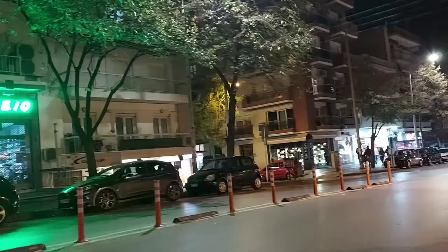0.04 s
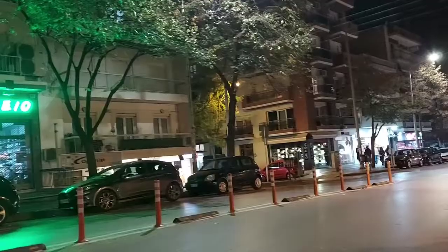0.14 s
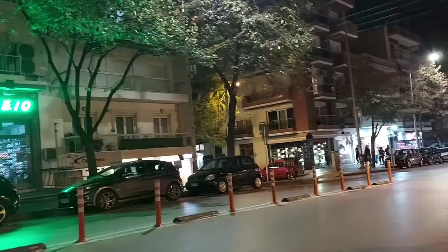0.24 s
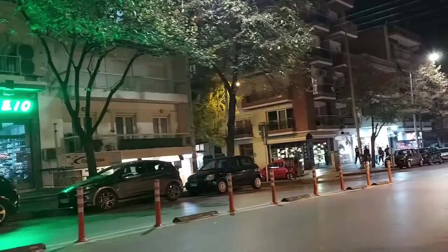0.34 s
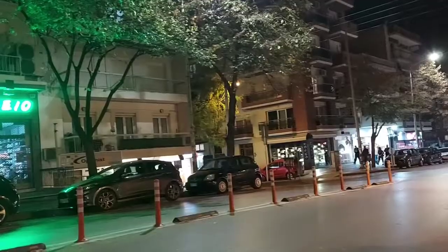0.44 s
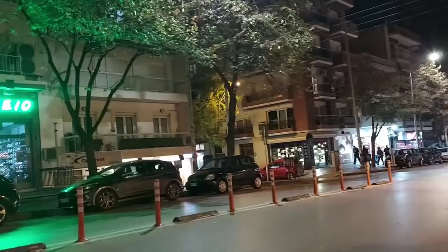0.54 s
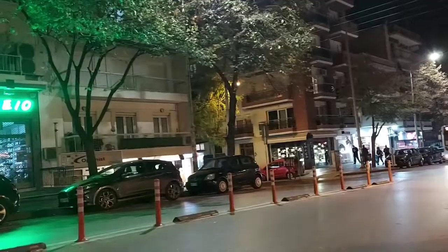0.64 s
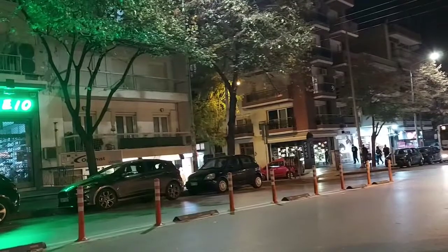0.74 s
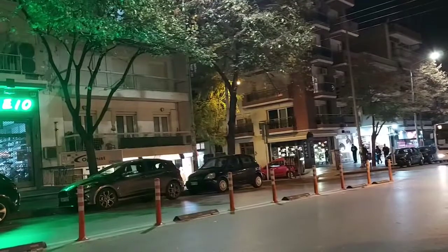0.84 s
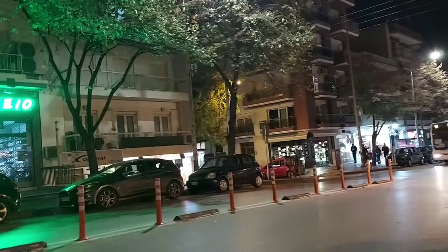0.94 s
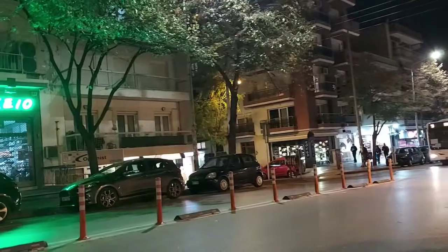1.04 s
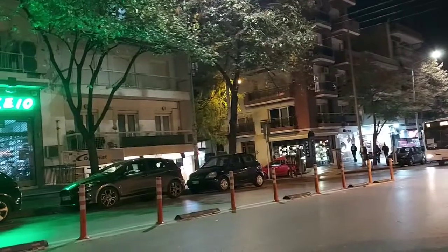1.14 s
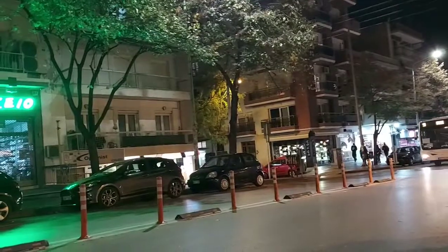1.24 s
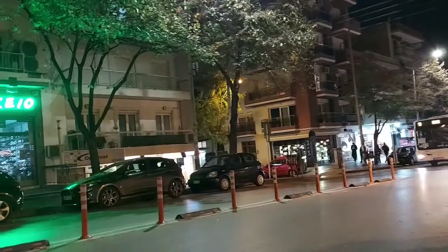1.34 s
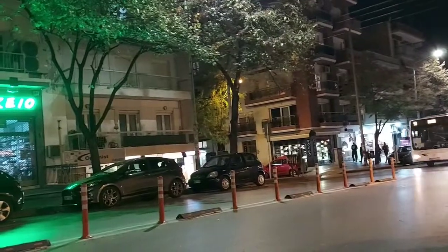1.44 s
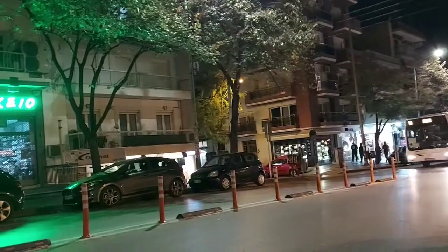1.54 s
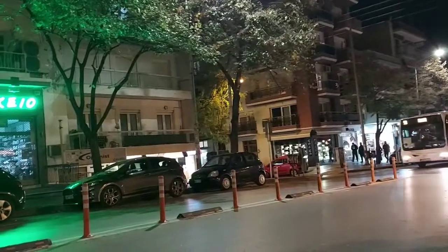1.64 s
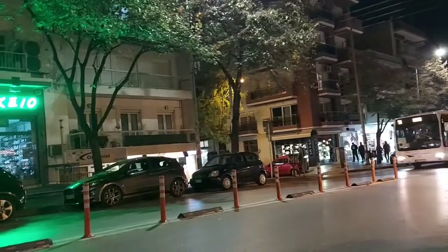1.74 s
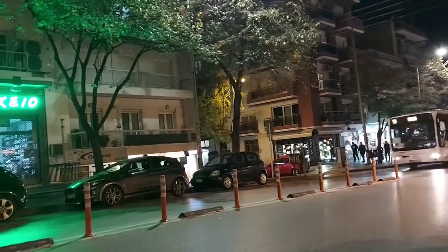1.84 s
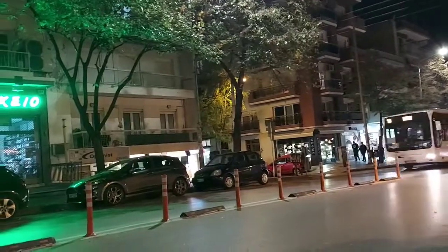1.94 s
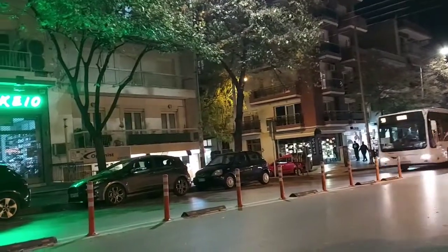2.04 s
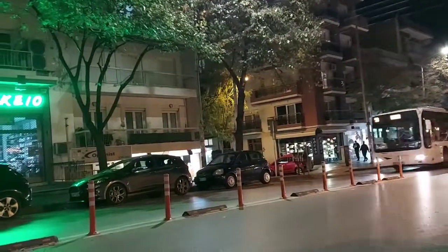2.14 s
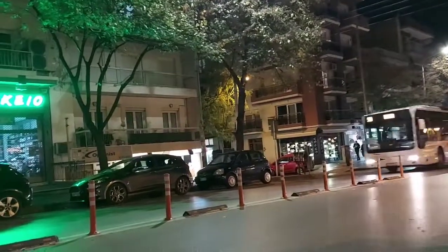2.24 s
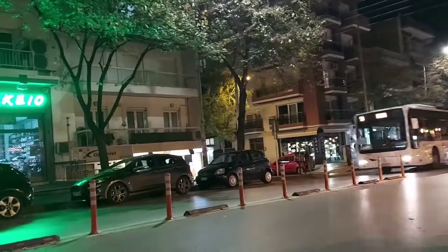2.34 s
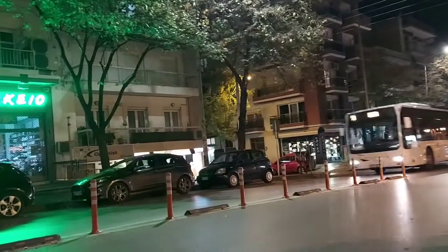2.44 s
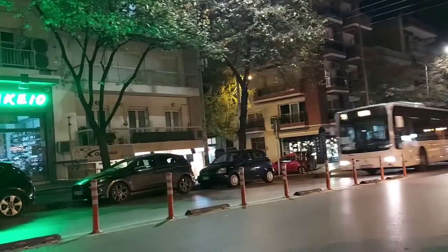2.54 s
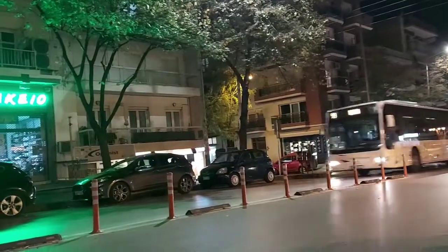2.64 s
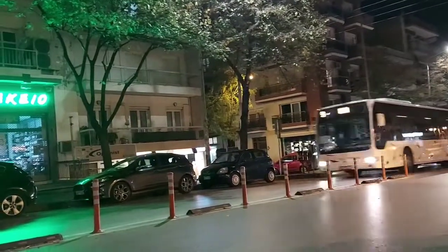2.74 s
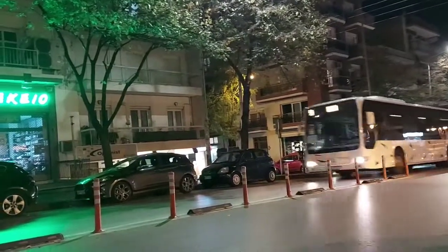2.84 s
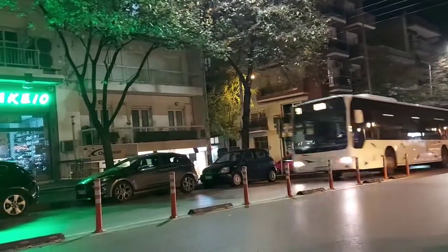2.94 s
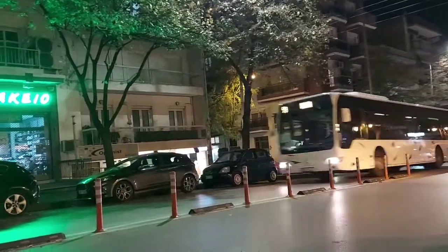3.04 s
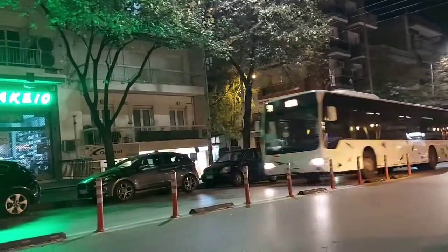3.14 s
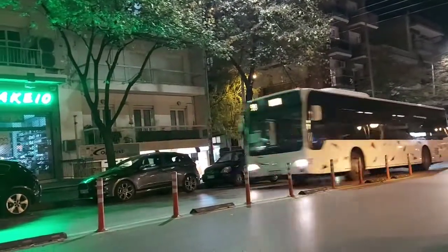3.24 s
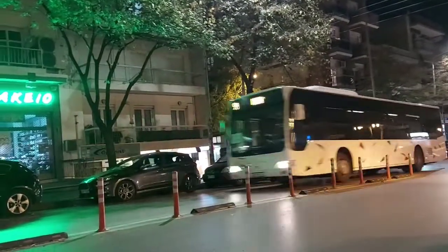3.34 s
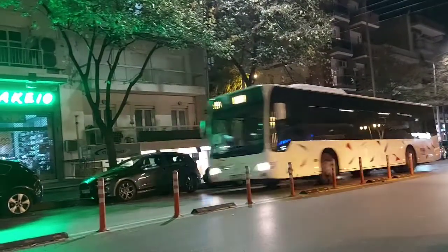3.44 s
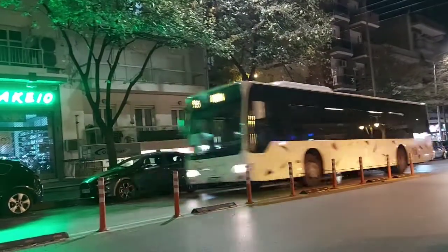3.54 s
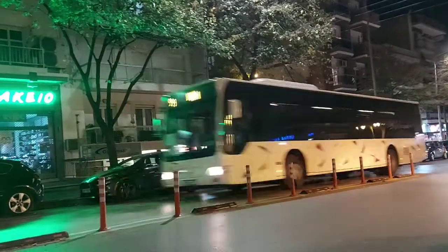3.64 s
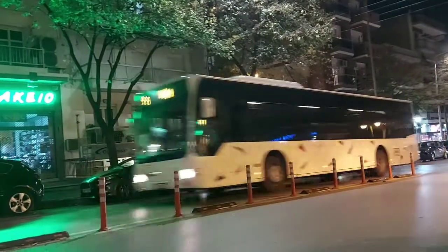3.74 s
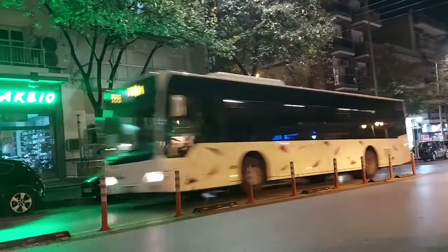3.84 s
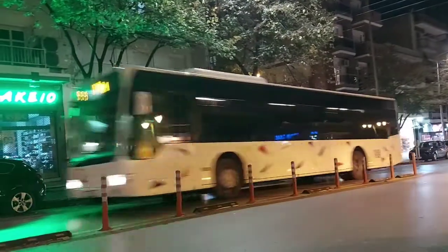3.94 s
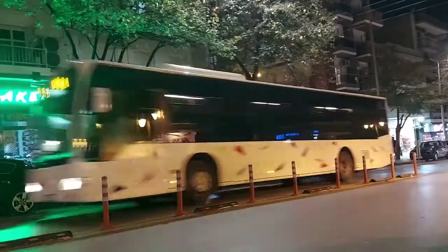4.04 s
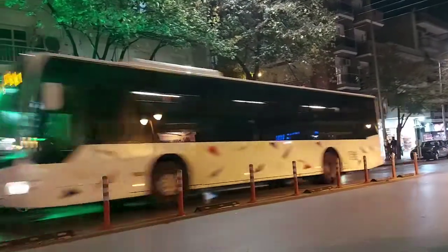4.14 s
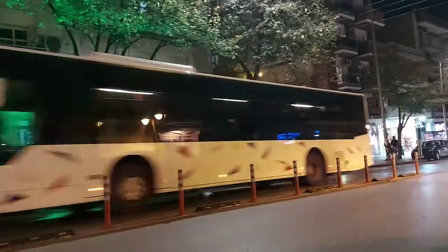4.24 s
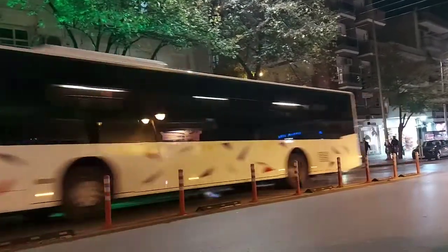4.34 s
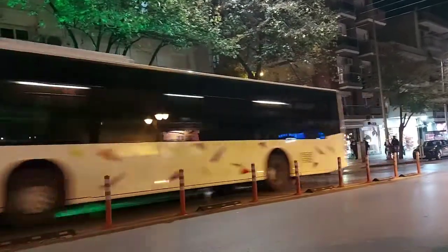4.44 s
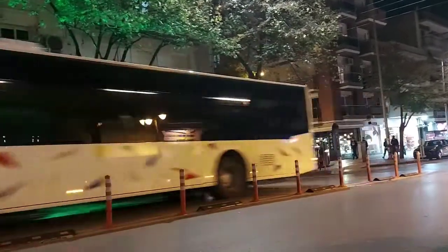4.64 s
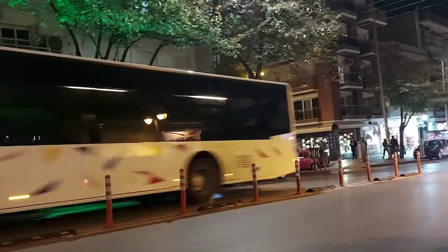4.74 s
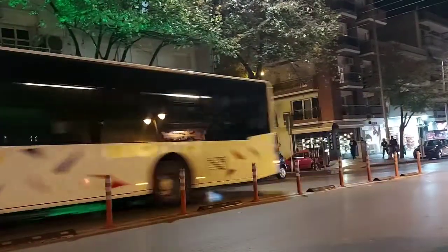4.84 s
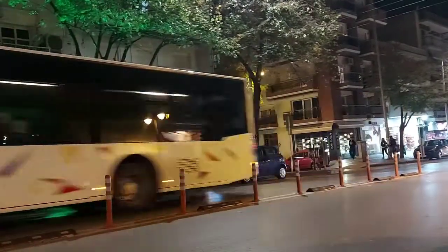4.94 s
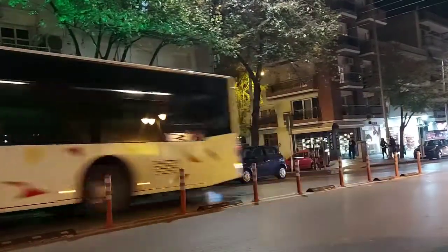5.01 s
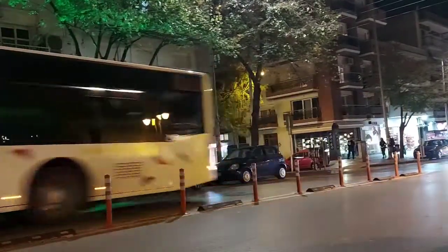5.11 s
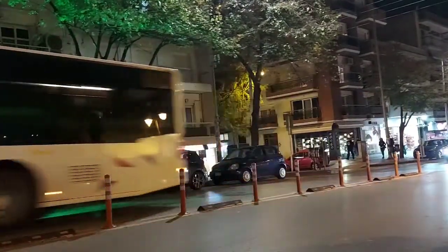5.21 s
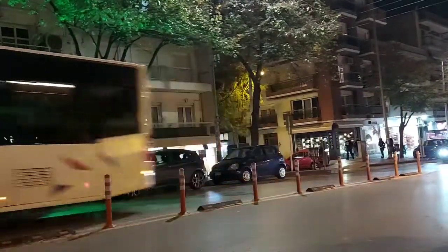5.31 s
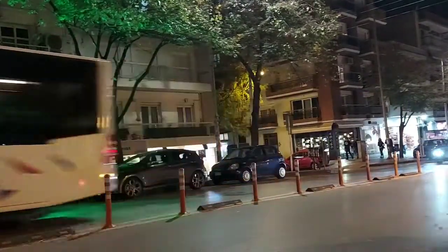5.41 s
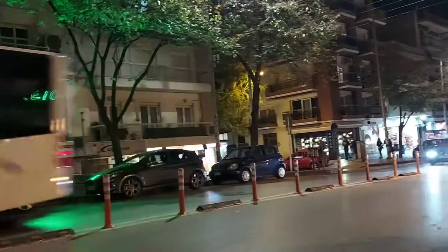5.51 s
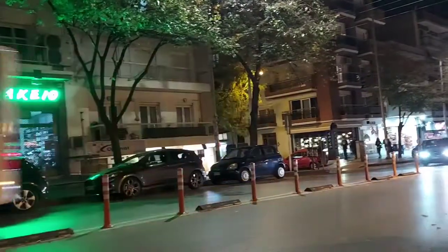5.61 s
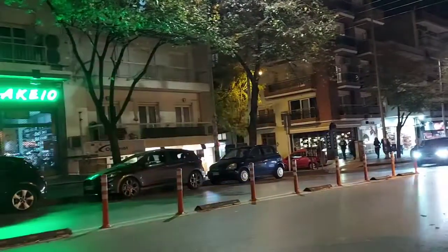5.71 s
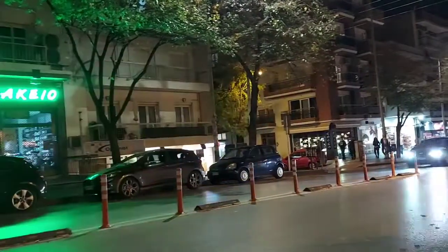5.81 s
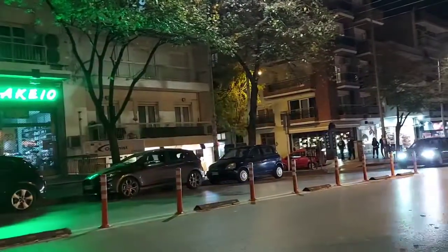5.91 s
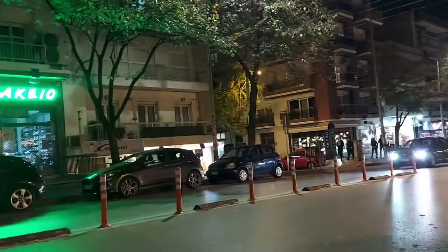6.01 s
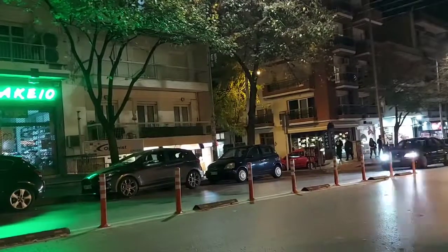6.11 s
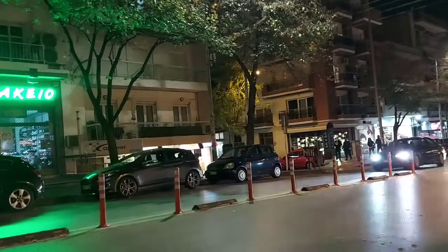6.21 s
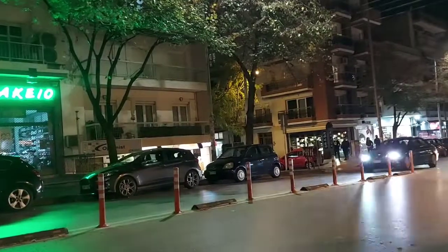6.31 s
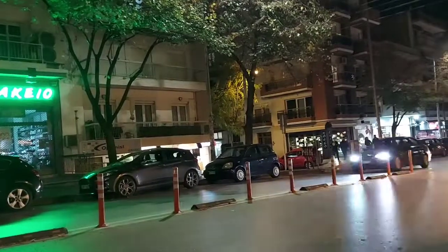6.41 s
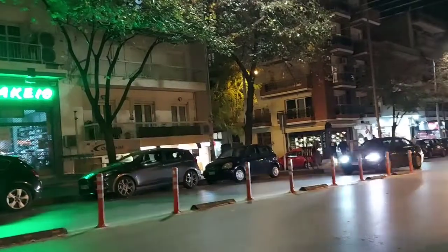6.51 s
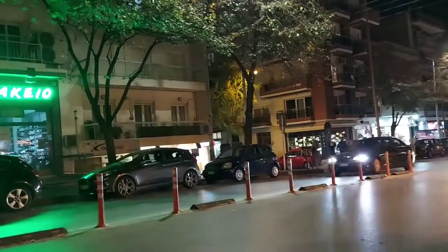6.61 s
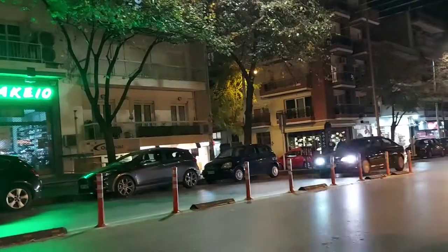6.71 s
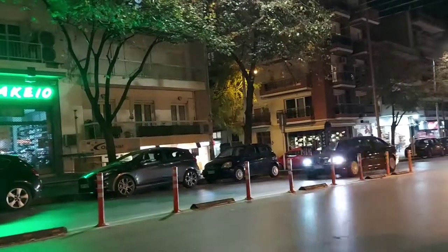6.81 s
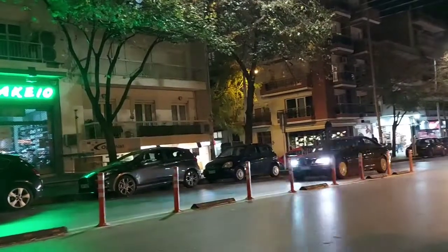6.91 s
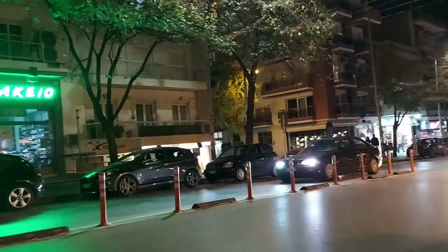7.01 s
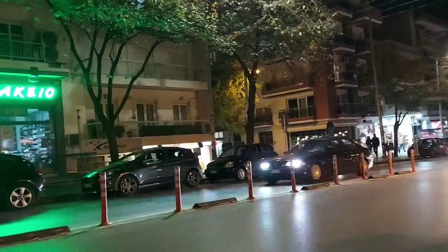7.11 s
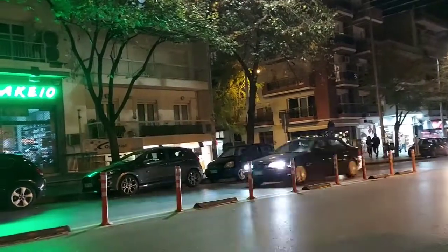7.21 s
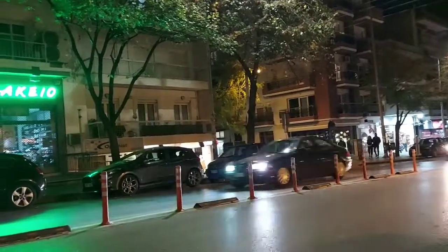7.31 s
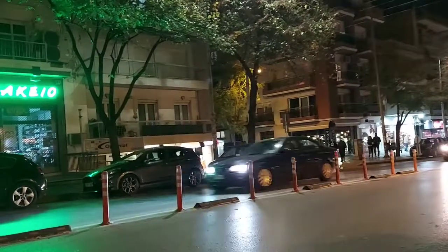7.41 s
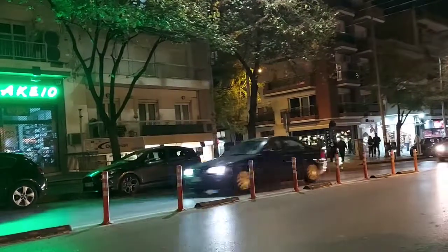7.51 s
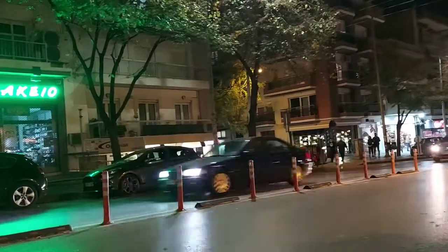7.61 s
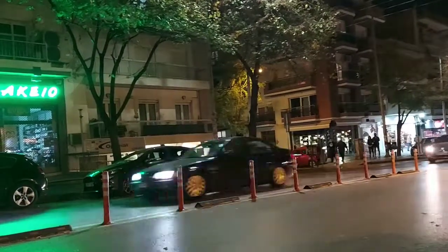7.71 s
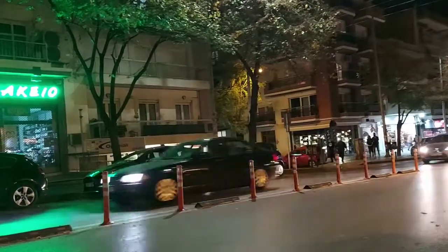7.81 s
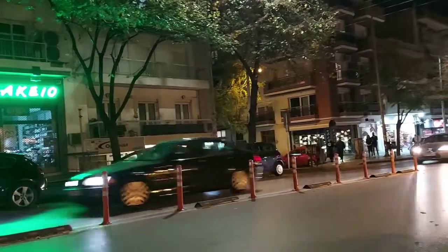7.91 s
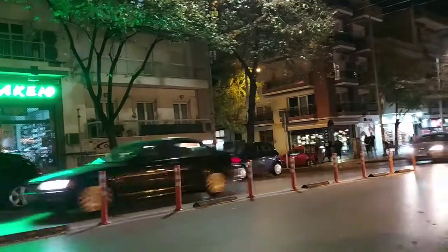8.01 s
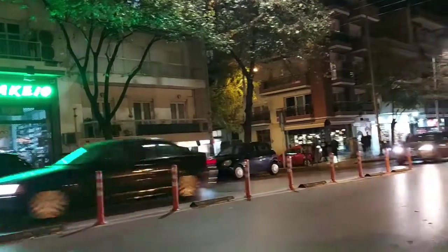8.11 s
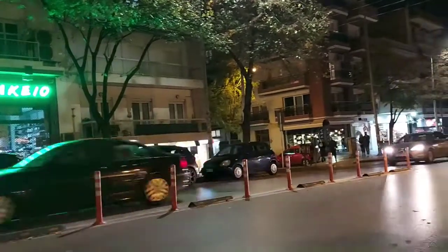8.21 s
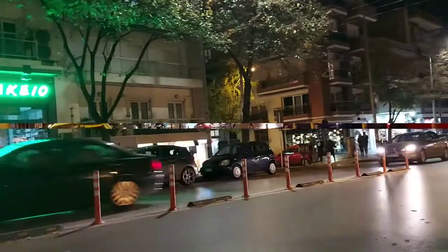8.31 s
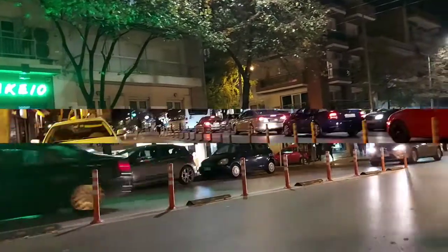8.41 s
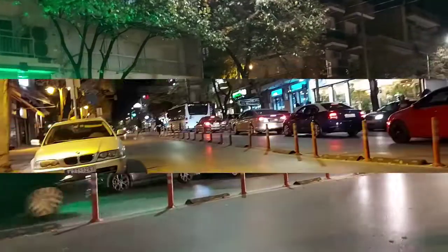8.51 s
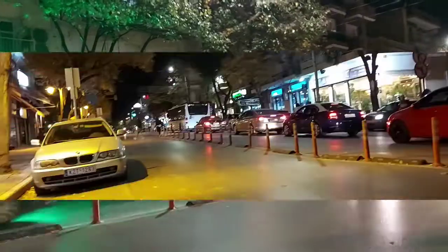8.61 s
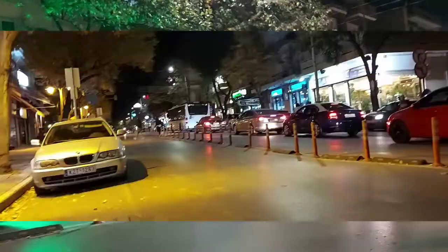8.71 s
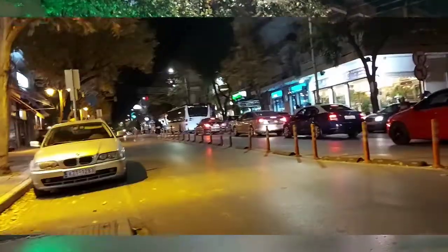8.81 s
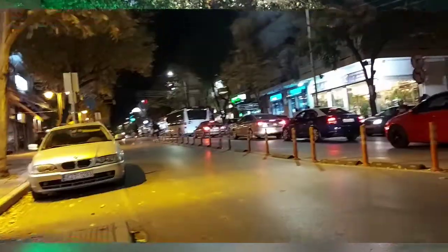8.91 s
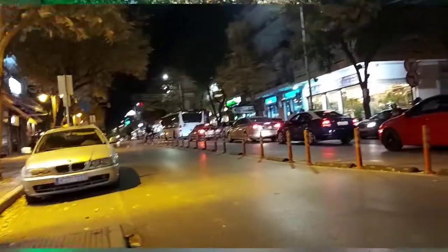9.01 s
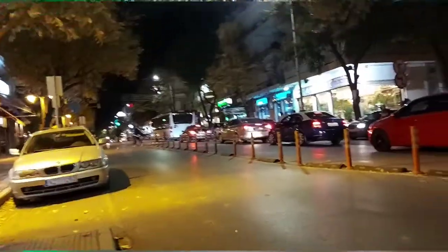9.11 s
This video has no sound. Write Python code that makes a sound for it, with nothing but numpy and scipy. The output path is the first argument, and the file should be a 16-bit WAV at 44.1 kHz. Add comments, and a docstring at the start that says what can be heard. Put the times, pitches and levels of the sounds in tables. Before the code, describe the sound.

A phone at the roadside picks up a soft distant putter and thin brake-like squeals, then a city bus growing from the right into a deep, throbbing diesel drone with knocking, fan hiss and gear whine. It recedes leftward, engine pitch sinking. A car follows, its engine rising and its tyres roaring and sizzling, until a hard cut. A brief gap leads to a quieter wash of slow traffic with one engine climbing. House fronts add short echoes.

```python
"""Night street, hand-held phone with two microphone ports, house fronts around.
At first faint squeals and a puttering, sinking engine up the street; a diesel city bus nears from the right.
At 5.3 s its engine is abreast, close by, droning, knocking and whining; at 6.4 s the exhaust quietens.
A car follows on the left, accelerating under a swelling tyre roar. At 8.8 s the sound is cut off with a very
short tail; after a brief hush a new scene starts, slow distant traffic.
Vehicles are shaft-locked tones and coloured noise; each part swells and fades as its beams sweep past."""
import sys
import numpy as np
from scipy import signal
from scipy.fft import rfft, irfft, next_fast_len
from scipy.io import wavfile
from scipy.ndimage import map_coordinates

SR = 44100
rng = np.random.default_rng(int(sys.argv[2]) if len(sys.argv) > 2 else 0)


def store_pcm(level_fs):
    """Save levels as 16-bit WAV."""
    pcm = np.round(np.clip(level_fs, -1, 1) * 32767).astype(np.int16)
    wavfile.write(sys.argv[1], SR, np.atleast_2d(pcm).T)


N = 403515
TIME = np.arange(N) / SR
SIZE = next_fast_len(N + 4096, True)
HZ = np.maximum(np.arange(SIZE // 2 + 1) * SR / SIZE, 1)

# Beams of a part: [faces the microphones t/s, level/dB then, approach width t/s, retreat width t/s].
# Noise colours: [f/Hz, density level/dB, relative: each colour is scaled to unit power].
# Lags are samples by which the left port is late; pans are right minus left in dB.

# Bus crank speed as heard, coasting and then braking: [t/s, crank turns per s]
CRANK = [(0, 35.3), (2.6, 34.4), (3.5, 33.65), (4.4, 33.05), (5, 32.2), (5.5, 30.8), (6.4, 28.4),
         (9.15, 21.5)]
# Exhaust boom: [crank multiple, beams as above]
EXHAUST = [(1.94, [(2.6, -29.5, 0.2, 0.49), (3.25, -30, 0.22, 0.15), (3.92, -24, 0.58, 0.5),
           (4.3, -27.5, 0.22, .45)]), (3, [(4.3, -23, 0.77, 0.4), (5.2, -18.5, 0.39, 0.51),
           (5.75, -18.5, 0.36, .8)]), (3.88, [(3.45, -32.5, 0.5, .4), (4.2, -26, 0.22, 0.088),
           (5.17, -26.5, 0.096, 0.16), (6.25, -53, .2, 0.27)])]
# Upper engine orders: [crank multiple, faces the microphones t/s, level/dB then, width t/s]
DRONE = [(1.47, 4.4, -39, 1.5), (5.88, 3.65, -40, .4), (5.88, 4.7, -35.5, .35), (5.85, 5.7, -44, .3),
         (7.42, 4.7, -43, .8), (8.27, 4.4, -36, .6), (9, 3.75, -37, .35), (9, 4.72, -36.5, .25),
         (9, 5.6, -43, .5), (10.35, 5.9, -43, .5), (13, 6, -46, .4), (14.75, 5.65, -44, .35),
         (16.33, 3.95, -41, .6), (16.27, 5.95, -42.5, .55), (18.42, 5, -42.5, .17), (20.5, 3.7, -44.5, .6),
         (21.65, 3.1, -44, .4), (22.55, 3.9, -44.5, .25)]
# Gear whine partials: [crank multiple, faces the microphones t/s, level/dB then, width t/s]
WHINE = [(32.5, 4.7, -47.5, .6), (32.5, 6.85, -48, .2), (46.8, 5.15, -46, .45), (48.6, 5.02, -43.5, .24),
         (53.3, 4.25, -50, .2), (64.3, 5.36, -49, .13), (65.1, 6.25, -51.5, .8), (92, 5.35, -52, .3),
         (93.85, 3.92, -47.5, .3), (93.5, 4.88, -51, .33), (93.4, 5.92, -47.5, .3),
         (93.9, 6.48, -51.5, .22), (114, 5.85, -57, .3), (130.6, 4.4, -54, .27), (130, 5.03, -50.5, .14),
         (130, 5.85, -54.5, .35), (140.3, 5.87, -50.5, .19)]
# Body rumble: beams [t/s, level/dB before a trim, t/s, t/s] and colour [f/Hz, level/dB]
RUMBLE_BEAMS = [(4.4, -26.5, 1.45, 0.98), (5.9, -34, 0.78, 1.1), (7.6, -31.5, 1, 1.5)]
RUMBLE = [(25, -33), (42, -17), (65, -8.5), (110, 1), (150, -4), (195, -11.5), (280, -7), (400, -14),
          (900, -52), (2500, -70)]
# Bus tyre noise: beams [t/s, level/dB before a trim, t/s, t/s] and colour [f/Hz, level/dB]
TYRE_BEAMS = [(3.6, -33.5, 1.94, 1.5), (6.4, -35.5, 1.8, 4.4)]
TYRES = [(100, -18), (300, -6), (500, -0.5), (750, -1), (1100, -6), (2500, -17), (9000, -65)]
# Front tyres singing forwards from the wedge of tread and road: beams, colour [f/Hz, level/dB]
HORN_BEAMS = [(3.15, -39.5, 0.61, 0.53)]
HORN = [(640, 3), (750, 6.5), (880, -7)]
# Diesel knock: beams [t/s, level/dB, t/s, t/s] and colour [f/Hz, level/dB]
KNOCK_BEAMS = [(5.05, -35.5, 1.46, 0.25), (5.9, -42, 0.55, .5)]
KNOCK = [(300, -5.5), (1000, -6.5), (1600, 2), (2300, -9.5), (4200, -25), (8000, -41), (14000, -58)]
# Growl of the rear engine bay: beams [t/s, level/dB, t/s, t/s] and colour [f/Hz, level/dB]
BAY_BEAMS = [(4.7, -33, 0.16, 0.24), (5.35, -32, 0.52, 1)]
BAY = [(270, -5), (315, 8.5), (420, -0.5), (560, 3.5), (660, -8.5), (780, -25), (950, -2.5), (1150, -19)]
# Fan: beams [t/s, level/dB, t/s, t/s] and colour [f/Hz, level/dB]
FAN_BEAMS = [(2.05, -44.5, 1, 0.58), (3.9, -45, 0.39, 0.19), (4.85, -45, 1, 1.5)]
FAN = [(500, -11), (1500, -5), (2200, 3), (3000, 4.5), (3650, -2.5), (4200, -0.5), (5500, -7.5),
       (7500, -10), (9000, -37), (14000, -44)]
# High hiss of the bus: beams [t/s, level/dB, t/s, t/s] and colour [f/Hz, level/dB]
HISS_BEAMS = [(3.2, -50.5, 0.25, 0.33), (5.5, -45, 1.32, 1.63)]
HISS = [(1500, -33), (4000, 3.5), (6000, -0.5), (7500, -2), (8600, -16.5), (10500, -5), (12500, -7.5),
        (14300, -19.5)]
# Loose panels rattling: [t/s, level/dB]
RATTLES = [(1.55, -40), (1.824, -36), (3.074, -31), (3.226, -34), (4.178, -31), (4.977, -32), (5.042, -30)]
# Wheels thudding over uneven asphalt: [t/s, level/dB]
THUDS = [(2.143, -30), (4.31, -16), (4.4, -19)]

# Car firing rate, cruising and then on open throttle: [t/s, f/Hz]
CAR_FIRING = [(7.15, 100), (7.5, 115), (8.3, 131.5), (8.8, 141.5)]
# Car engine: beams [t/s, level/dB, t/s, t/s]
CAR_ENGINE_BEAMS = [(7.08, -38.5, 0.14, 0.091), (7.62, -32, 0.27, 0.34), (8.7, -25, 0.53, 1.1)]
# Upper orders of the car engine: [multiple of the firing rate, level/dB against the firing tone]
CAR_ORDERS = [(1.96, -6.5), (2.94, -10), (4.55, -9)]
# Low sinking boom with the car: [reference t/s, f/Hz then, fall in Hz per s]; beams [t/s, level/dB, t/s, t/s]
BOOM = (8.5, 62.4, 5.2)
BOOM_BEAMS = [(6.66, -30.5, .17, 0.23), (8.1, -33, 0.16, 0.35), (8.55, -26.5, 0.26, 0.4)]
# Car tyre roar: beams [t/s, level/dB, t/s, t/s] and colour [f/Hz, level/dB]
CAR_TYRE_BEAMS = [(8.85, -23.5, 0.97, 1.1)]
CAR_TYRES = [(100, -7.5), (380, -7), (600, -5), (950, -7.5), (1150, -9.5), (1700, -7), (2200, -10.5),
             (3000, -17), (5000, -29), (7500, -29.5), (8600, -42.5), (11000, -31.5), (14300, -42)]
# Hum of the air in the car tyres: beams [t/s, level/dB, t/s, t/s]
HUM_BEAMS = [(7.6, -31, 0.97, 0.37), (8.45, -27, 0.63, 0.94)]

# Engine up the street: [reference t/s, f/Hz then, fall in Hz per s]
FAR_ENGINE = (1.3, 68.4, 2.1)
# Its orders: [multiple, loudest t/s, level/dB then, width t/s]
FAR_ORDERS = [(1, 1.77, -32.5, 0.72), (1.25, 0.19, -37, 0.45), (3.94, 0.99, -39.5, 1)]
# Its exhaust puffs: [first t/s, puffs per s]; beams [t/s, level/dB on top of the pipe bands, t/s, t/s]
PUFFS = (.003, 16.86)
PUFF_BEAMS = [(1.8, -1.1, 6, 2.15)]
# Bands in which the pipe rings: [low f/Hz, high f/Hz, level/dB before the beams]
PIPE = [(70.6, 133, -32), (246, 325, -41.5)]
# Faint squeals up the street: [t/s, f/Hz, level/dB]
SQUEALS = [(0.084, 1045, -52), (.01, 1580, -47.5), (.23, 1600, -52)]
# Distant queue, dull wash: colour [f/Hz, level/dB]
QUEUE = [(40, -6), (110, 4.5), (200, -6), (330, -8.5), (520, -11.5), (900, -15), (1900, -22.5),
         (2400, -28.5), (7500, -43), (14000, -57)]
# Thin engine whine idling in the queue: [f/Hz, level/dB]
IDLE = [(1852, -53)]
# One car of the queue pulling away: [f/Hz as the new scene starts, climb in Hz per s, level/dB]
PULLING_AWAY = (288, 245, -39)
# Right microphone port, which rings and then closes towards the treble: [f/Hz, level/dB]
RIGHT_PORT = [(2200, 0), (3400, 4), (4200, 4), (5200, 0), (7200, -10), (8000, -10), (8800, -51),
              (10500, -51), (12200, -31), (14000, -28)]

# What the street carries of each part from any distance; rumble and tyres are trimmed later
FAR_RUMBLE_DB, FAR_TYRES_DB, FAR_KNOCK_DB, FAR_FAN_DB, FAR_HISS_DB = -29.5, -38.5, -47.5, -46, -55.5
FAR_EXHAUST_DB, FAR_CAR_DB = -43.5, -50
# Bus abreast of the microphones, and time to cover its distance from the kerb
ABREAST_S, CROSSING_S = 5.29, 0.95
# Lag and pan abreast, and their swing to either side
BUS_LAG, BUS_LAG_SWING, BUS_PAN_DB, BUS_PAN_SWING_DB = -7, 20.2, 5.5, 3.5
# The driver lifts off and the exhaust quietens
LIFT_S, LIFT_TAKES_S, LIFT_DB = 6.35, 0.18, -10.5
# The firing tone beats with its echo until the beat fades
BEAT_HZ, BEAT_DIP_S, BEAT_DEPTH, BEAT_FADES_S = 2.62, 4.65, 0.38, 5.46
THROB_DEPTH = 0.14  # of the body rumble, once per engine cycle
CAR_LAG = -24  # samples, a bearing to the left
BASS_STRETCH = 1.27  # bass bends around the phone, which stretches its lag
PORT_SPACING_S, CUTOFF_HZ = 0.00087, 14600
CUT_S, NEW_SCENE_S = 8.798, 8.875


def bus():
    """Engine tones, body, tyres, knock and fan travel past together from right to left."""
    lag, pan_db = bus_bearing()
    crank = angle(along(CRANK))
    out = bus_tones(crank, lag, pan_db) + bus_body(crank, lag, pan_db) + bus_tyres(lag, pan_db)
    return out + bus_knock(crank, lag, pan_db) + bus_fan(lag, pan_db)


def bus_bearing():
    """Lag and pan of a straight drive past the microphones."""
    side = (ABREAST_S - TIME) / np.hypot(ABREAST_S - TIME, CROSSING_S)
    return BUS_LAG + BUS_LAG_SWING * side, BUS_PAN_DB + BUS_PAN_SWING_DB * side


def bus_tones(crank, lag, pan_db):
    """Exhaust boom, drone and gear whine are multiples of one crank; the house fronts return the upper ones."""
    upper = orders(DRONE, crank, rough=.27, rate=6) + orders(WHINE, crank, rough=.6, rate=21)
    out = placed(exhaust_boom(crank), BASS_STRETCH * lag, 0) + placed(upper, lag, 0.08 * pan_db)
    return out + house_echo(upper, delays_s=(.071, .094), db=-8.0)


def exhaust_boom(crank):
    """Three low crank orders leave the pipe; the middle one, three per turn, is the firing tone."""
    load = from_db(LIFT_DB * eased(LIFT_S, LIFT_TAKES_S))
    depth = BEAT_DEPTH * (1 - eased(BEAT_FADES_S, takes_s=0.57))
    beat = 1 - depth * np.cos(2 * np.pi * BEAT_HZ * (TIME - BEAT_DIP_S))
    low, firing, high = (passing(beams, FAR_EXHAUST_DB) * tone(k * crank, rough=.04, rate=4)
                         for k, beams in EXHAUST)
    return load * (low + beat * firing + high)


def bus_body(crank, lag, pan_db):
    """The body rumbles and throbs every two crank turns, panels rattle, and wheels thud."""
    throb = 1 + THROB_DEPTH * np.cos(crank / 2)
    rumble = passing(RUMBLE_BEAMS, FAR_RUMBLE_DB) * from_db(-3.0) * throb
    out = rumble * street_noise(RUMBLE, BASS_STRETCH * lag, 0.45, echo=0.69)
    panels = street_noise([(900, 3), (2800, 18), (8000, -47)], lag, pan_db, echo=0.5)
    out += bursts(RATTLES, rise_s=0.00065, decay_s=0.0032) * panels
    asphalt = noise(colour([(40, -7), (80, 15), (300, -27)]))
    return out + bursts(THUDS, rise_s=0.0038, decay_s=0.026) * asphalt


def bus_tyres(lag, pan_db):
    """Tread noise, plus a narrow band sung forwards by the horn-shaped wedge of tread and road."""
    roar = passing(TYRE_BEAMS, FAR_TYRES_DB) * from_db(-1.63)
    out = roar * street_noise(TYRES, lag, 1.09 * pan_db, echo=0.67)
    return out + passing(HORN_BEAMS, far_db=-52.0) * street_noise(HORN, lag, 0.5 * pan_db, echo=0.44)


def bus_knock(crank, lag, pan_db):
    """Each firing pulses the knock and the growl of the rear engine bay."""
    pulses = firing_pulses(crank, depth=.55, uneven=.2)
    knock = passing(KNOCK_BEAMS, FAR_KNOCK_DB) * from_db(0.2 * drift(5.8)) * pulses
    out = knock * street_noise(KNOCK, lag, 0.34 * pan_db, echo=0.93)
    return out + passing(BAY_BEAMS, far_db=-50.5) * pulses * street_noise(BAY, lag, 0, echo=0.49)


def firing_pulses(crank, depth, uneven):
    """Six cylinders fire in two turns, each with its own strength, varied each time; unit rms."""
    firing = 3 * crank / (2 * np.pi)
    count = firing.astype(int)
    cylinder = rng.standard_normal(6)[count % 6]
    single = rng.standard_normal(count[-1] + 1)[count]
    return rms_one(np.exp(np.sin(np.pi * firing) ** 2 * (depth + uneven * (cylinder + single))))


def bus_fan(lag, pan_db):
    """Fan noise and a higher hiss, both flickering slightly in level."""
    fan = passing(FAN_BEAMS, FAR_FAN_DB) * from_db(0.72 * drift(22))
    hiss = passing(HISS_BEAMS, FAR_HISS_DB) * from_db(1.2 * drift(18))
    out = fan * street_noise(FAN, lag, 2.63 * pan_db, echo=0.89)
    return out + hiss * street_noise(HISS, lag, 0.31 * pan_db, echo=0.97)


def car():
    """Tyre roar swells on the left while the engine climbs in pitch."""
    arriving = eased(5.8, takes_s=0.23)
    return arriving * (car_tyres() + placed(car_engine(), BASS_STRETCH * CAR_LAG, -1.2))


def car_engine():
    """A firing tone and its upper orders rise with the throttle, over a boom that sinks."""
    firing = angle(along(CAR_FIRING))
    upper = sum(from_db(db) * tone(k * firing, rough=0.75, rate=13) for k, db in CAR_ORDERS)
    effort = passing(CAR_ENGINE_BEAMS, far_db=-41)
    engine = effort * (tone(firing, rough=0.083, rate=11.0) + upper)
    boom_s, boom_hz, sag = BOOM
    boom = tone(angle(boom_hz - sag * (TIME - boom_s)), rough=0.17, rate=8.3)
    return engine + passing(BOOM_BEAMS, far_db=-67) * boom


def car_tyres():
    """Tread roar, a fine sizzle that carries only at close range, and the tyre air humming near 280 Hz."""
    roar = passing(CAR_TYRE_BEAMS, FAR_CAR_DB) * from_db(1.0 * drift(24))
    out = roar * street_noise(CAR_TYRES, CAR_LAG, -9.5, echo=0.67)
    sizzle = street_noise([(2500, 10.0), (7000, 1), (14000, -2)], CAR_LAG, -10.5, echo=0.31)
    out += from_db(-33.0) * swell(9.1, width_s=0.58) * sizzle
    hum = street_noise([(232, -3.5), (268, 9.0), (310, 6.0), (350, -9.5)], CAR_LAG, -1.2, echo=0.54)
    return out + passing(HUM_BEAMS, far_db=-53) * hum


def far_engine():
    """Up the street to the right, a puttering exhaust and a faint drone of orders sinking in pitch."""
    s, hz, sag = FAR_ENGINE
    drone = orders(FAR_ORDERS, angle(hz - sag * (TIME - s)), rough=0.48, rate=7.2)
    return placed(drone + putter(count=150), 21, 0)


def putter(count):
    """Puffs at a steady 16.86 per second ring the exhaust pipe, uneven in timing and strength."""
    first_s, per_s = PUFFS
    out = 0
    for low_hz, high_hz, db in PIPE:
        late, strong = rng.standard_normal((count, 2)).T
        puff_s = np.abs(first_s + np.arange(count) / per_s + .0018 * late)
        clicks = np.zeros(N)
        clicks[(puff_s * SR).astype(int)] = from_db(1.6 * strong)
        band = signal.butter(2, [low_hz, high_hz], "band", fs=SR, output="sos")
        rings = signal.sosfilt(band, clicks + 1e-18)
        out = out + from_db(db) * rms_one(rings)
    return passing(PUFF_BEAMS, far_db=-27) * out


def squeals():
    """Brief thin tones, like brakes far off."""
    return sum(from_db(db) * swell(s, width_s=0.097) * tone(2 * np.pi * hz * TIME, rough=0.2, rate=9.8)
               for s, hz, db in SQUEALS)


def queue():
    """Slow traffic farther off: a dull noise wash, one engine idling and one climbing as it pulls away."""
    engines = sum(from_db(db) * tone(2 * np.pi * hz * TIME, rough=0.32, rate=6) for hz, db in IDLE)
    start_hz, climb, db = PULLING_AWAY
    engines += from_db(db) * tone(angle(start_hz + climb * (TIME - NEW_SCENE_S)), rough=0.33, rate=24)
    return from_db(-30.5) * street_noise(QUEUE, -19, -1.7, echo=0.86) + placed(engines, -16, 0)


def passing(beams, far_db):
    """Gain of a moving part: each beam rises and falls with distance and angle, over a steady far share."""
    power = from_db(far_db) ** 2
    for s, db, approach_s, retreat_s in beams:
        away = (TIME - s) / np.where(TIME < s, approach_s, retreat_s)
        power = power + (from_db(db) / (1 + away ** 2)) ** 2
    return np.sqrt(power)


def orders(rows, turn, rough, rate):
    """Tones locked to one shaft; each swells as its beam sweeps over the microphones."""
    return sum(from_db(db) / (1 + ((TIME - s) / width_s) ** 2) * tone(k * turn, rough, rate)
               for k, s, db, width_s in rows)


def tone(phase, rough, rate):
    """A sine of unit rms whose height and phase waver as the echo paths change."""
    level = np.sqrt(2 / (1 + 2 * rough ** 2))
    return level * ((1 + rough * drift(rate)) * np.sin(phase) + rough * drift(rate) * np.cos(phase))


def street_noise(spectrum, lag, pan_db, echo):
    """A noise source of unit rms before panning: direct sound plus a power share of street echo."""
    echo, gain = np.clip(echo, 0, 1), colour(spectrum)
    direct = placed(noise(gain), lag, pan_db)
    return np.sqrt(1 - echo) * direct + np.sqrt(echo) * diffuse(gain)


def placed(x, lag, pan_db):
    """Direct sound is split between the ports by arrival time and by level."""
    at = np.arange(N)
    left, right = (map_coordinates(x, [at + sign * lag / 2], order=3) for sign in (-1, 1))
    return np.array([left * from_db(-pan_db / 2), right * from_db(pan_db / 2)])


def diffuse(gain):
    """Noise thrown back by the house fronts: largely alike at both ports only in the bass."""
    alike = np.sinc(2 * HZ * PORT_SPACING_S)
    mid = noise(gain * np.sqrt((1 + alike) / 2))
    side = noise(gain * np.sqrt((1 - alike) / 2))
    return np.array([mid + side, mid - side])


def house_echo(x, delays_s, db):
    """The house fronts return the gliding tones late, so that they beat with the direct ones."""
    return from_db(db) * np.array([np.interp(TIME - s, TIME, x, left=0) for s in delays_s])


def noise(gain):
    """White noise shaped by a gain per frequency."""
    white = rng.standard_normal((2, len(HZ)))
    return irfft((white[0] + 1j * white[1]) * gain, SIZE)[:N] * np.sqrt(SIZE / 2)


def colour(spectrum):
    """Gain per frequency with unit mean power; the ends of the spectrum fall away steeply."""
    f, db = np.transpose(spectrum)
    ends = (1 + (.8 * f[0] / HZ) ** 8) * (1 + (.8 * HZ / f[-1]) ** 8)
    return rms_one(from_db(np.interp(np.log(HZ), np.log(f), db)) / np.sqrt(ends))


def bursts(events, rise_s, decay_s):
    """Envelope of blows that rise quickly and die away, each cut after half a second."""
    out = np.zeros(N)
    for s, db in events:
        start = int(s * SR)
        age = TIME[:N - start][:SR // 2]
        out[start:][:len(age)] += from_db(db) * (1 - np.exp(-age / rise_s)) * np.exp(-age / decay_s)
    return out


def drift(rate):
    """Slow chance with spread 1, made at a hundredth of the sample rate; rate in Hz."""
    r = np.exp(-200 * np.pi * rate / SR)
    white = rng.standard_normal(N // 100 + 1002)
    slow = signal.lfilter([1], [1, -2 * r, r * r], white)[1000:]  # drops the filter's start
    return np.interp(np.arange(N) / 100, np.arange(len(slow)), rms_one(slow))


def angle(hz):
    """Angle turned at a changing rate."""
    return 2 * np.pi * np.cumsum(hz) / SR


def along(curve):
    """A control that moves in straight lines between its points."""
    return np.interp(TIME, *np.transpose(curve))


def swell(s, width_s):
    """A smooth rise and fall around one moment."""
    return np.exp(-((TIME - s) / width_s) ** 2)


def eased(s, takes_s):
    """A smooth step from 0 to 1 around one moment."""
    return .5 + .5 * np.tanh((TIME - s) / takes_s)


def filtered(x, gain_at):
    """Filter by a gain that is a function of frequency."""
    return irfft(rfft(x, SIZE) * gain_at(HZ), SIZE)[..., :N]


def from_db(db):
    """Decibels to gain."""
    return 10 ** (np.asarray(db) / 20)


def rms_one(x):
    """Scale to unit rms."""
    return x / np.sqrt(np.mean(x ** 2) + 1e-20)


def scene():
    """The street is cut off with a very short tail; after a brief hush a new scene starts, the distant queue."""
    after = TIME - CUT_S
    tail = np.where(after < 0, 1, from_db(-6.5) * np.exp(-np.abs(after) / 0.0054))
    street = bus() + car() + far_engine() + squeals()
    # the queue lies faintly under the street until its own scene starts
    return street * tail + queue() * np.where(TIME > NEW_SCENE_S, 1, from_db(-43))


def record(dry):
    """The right microphone port colours its side; the top is cut at both."""
    f, db = np.transpose(RIGHT_PORT)
    right = filtered(dry[1], lambda hz: from_db(np.interp(np.log(hz), np.log(f), db)))
    return filtered(np.array([dry[0], right]), lambda hz: np.clip((CUTOFF_HZ - hz) / 150, 0, 1))


dry = scene()
out = record(dry)
store_pcm(out)
```